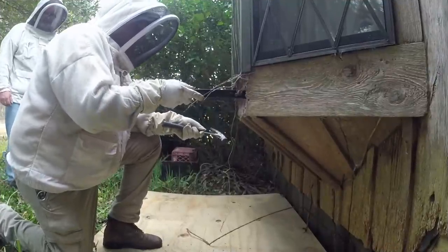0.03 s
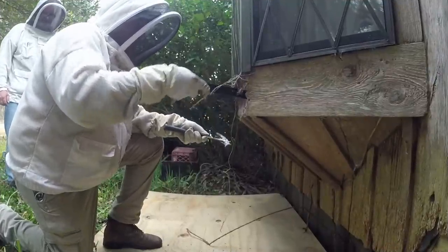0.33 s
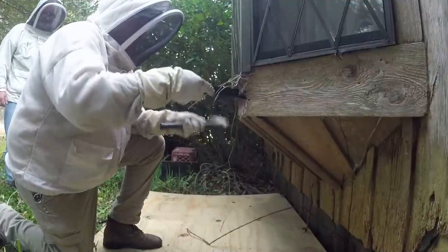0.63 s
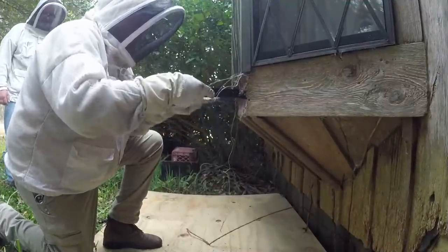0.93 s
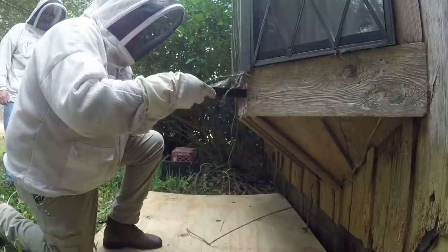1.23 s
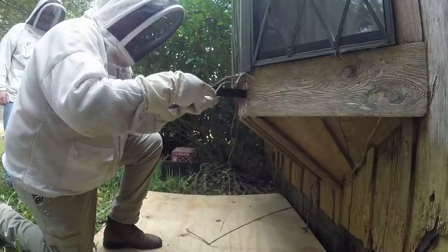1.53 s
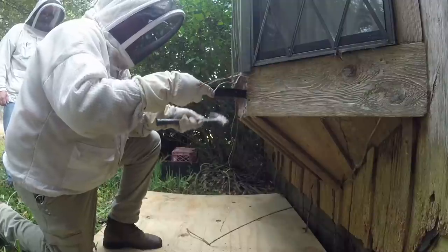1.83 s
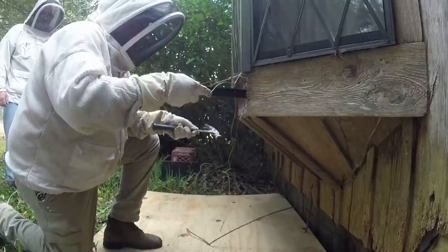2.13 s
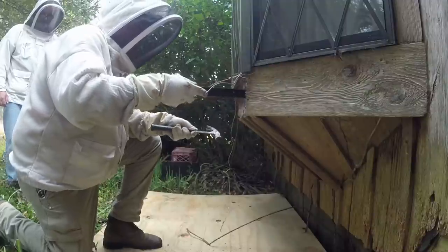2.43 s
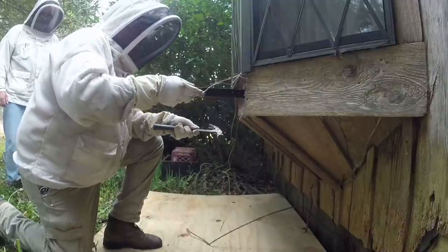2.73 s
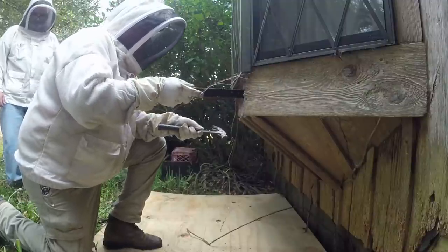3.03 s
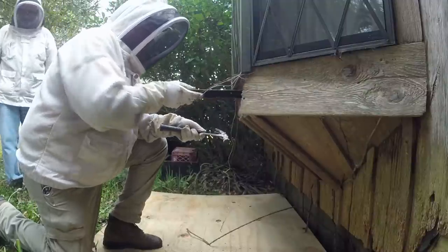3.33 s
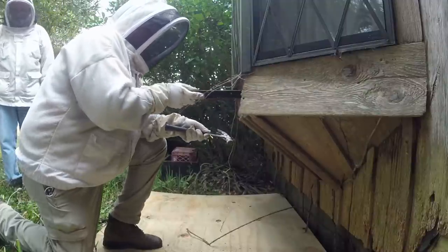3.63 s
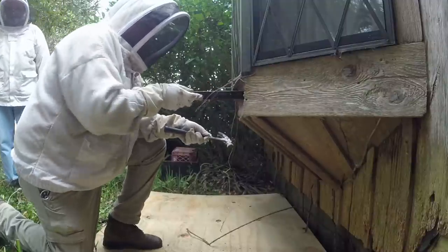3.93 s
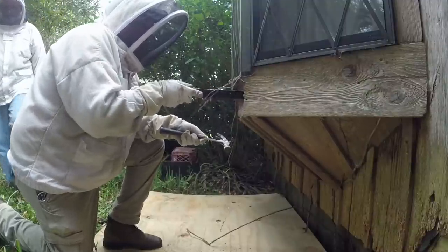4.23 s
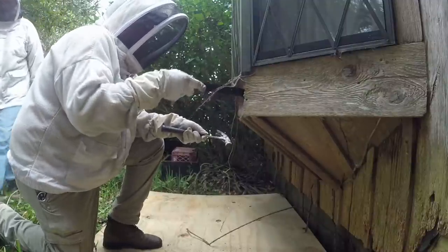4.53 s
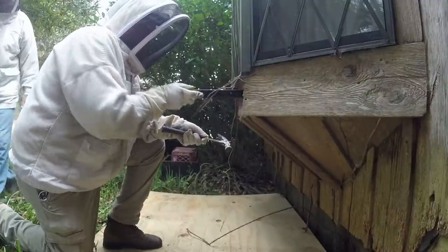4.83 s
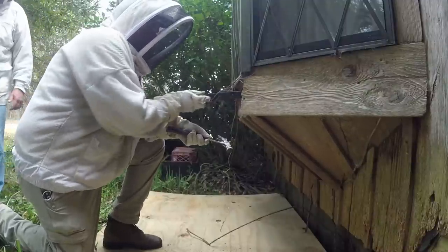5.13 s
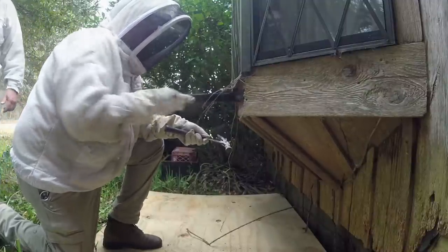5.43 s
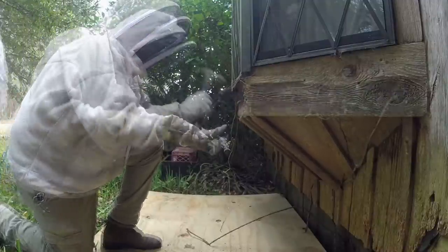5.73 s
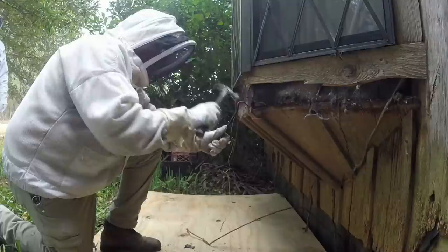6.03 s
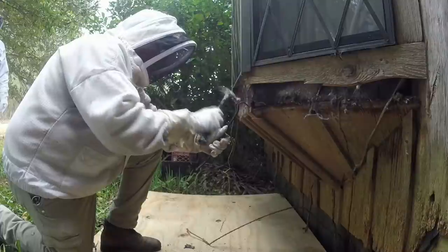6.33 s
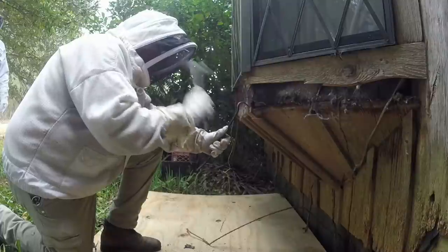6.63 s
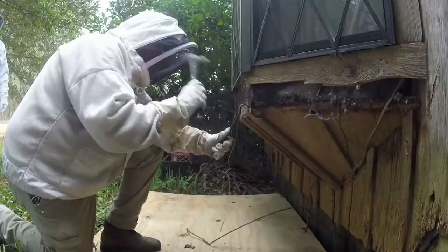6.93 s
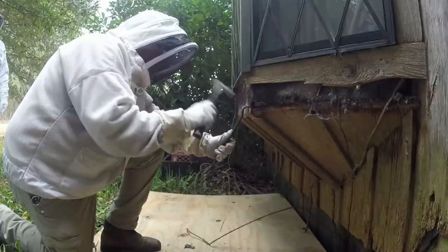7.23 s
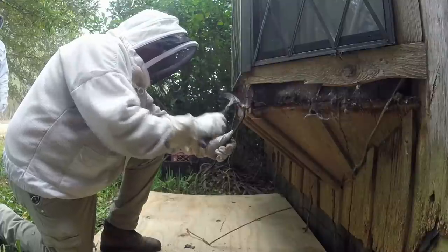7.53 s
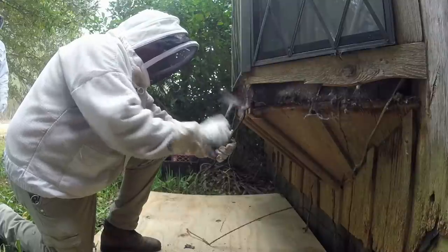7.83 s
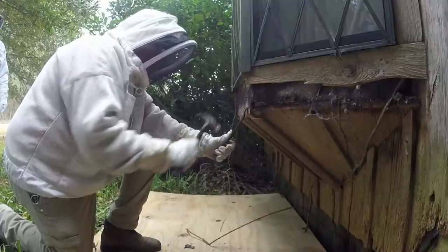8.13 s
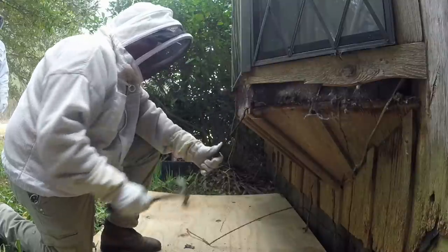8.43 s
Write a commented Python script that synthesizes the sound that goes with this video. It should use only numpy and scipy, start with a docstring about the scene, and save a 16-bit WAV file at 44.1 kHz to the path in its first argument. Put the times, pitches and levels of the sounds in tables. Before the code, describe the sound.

A steel pry bar scrapes in behind a wooden board on an outside wall, sticking and slipping for the first half second or so. Gloves rustle, and two hammer blows clang on the bar at about 1.1 and 1.6 seconds. From 2.5 to 3.8 seconds the board gives way in loud, dry cracks and knocks, with fibres splintering. Until nearly 6 seconds it is worked off the wall more quietly, with rubbing, creaks, small snaps and the rustle of heavy cloth; a nail gives a brief squeak at 5.3 seconds. At 5.6 seconds a hammer taps a nail, then hits it six times at an even pace from 6 to 7.9 seconds. Each blow thumps the wall and rings the steel, and the nail's pitch climbs. Everything sounds close, with a short yard echo, over faint air and a low breeze.

```python
"""A flat steel pry bar scrapes in behind a trim board on an outside wall, sticking and slipping.
Two hammer blows drive it home. Levered, the board gives way in dry cracks as nails slip and fibres snap.
It is pulled off, rubbing and creaking, gloves and heavy cloth rustling; the last nail squeaks free.
The hammer then taps a nail and hits it six times: the wall thumps, the steel rings, the yard echoes.
Faint air and a low breeze run throughout."""
import sys
import numpy as np
from scipy import signal
from scipy.fft import rfft, irfft, next_fast_len
from scipy.io import wavfile
from scipy.ndimage import uniform_filter1d, map_coordinates

SR = 44100
rng = np.random.default_rng(int(sys.argv[2]) if len(sys.argv) > 2 else 0)


def master_out(mix):
    """Clip the mix to full scale and print it as 16-bit PCM to the path in sys.argv[1]."""
    frames = np.transpose(np.atleast_2d(mix))
    ceiling = np.clip(frames, -1, 1)
    pcm = np.round(ceiling * 32767).astype(np.int16)
    wavfile.write(sys.argv[1], SR, pcm)


N = 374409
SIZE = 32768  # samples per event
T = np.arange(SIZE) / SR
HZ = np.fft.rfftfreq(SIZE, 1 / SR)

# Table levels are relative; the functions add their own gains.
# hammer on nail: t/s, strength/dB, hardness/dB, wall f/Hz, nail f/Hz, head ring/dB, claw ring/dB
NAIL_BLOWS = [(5.6486, -12, -1.5, 128, 1900, -52, -62), (6.0157, 0, -1.5, 120.3, 1997, -51.5, -66.5),
              (6.3996, 1, -3, 118.4, 2060, -50, -55.5), (6.755, 2, -2.5, 158, 2475, -43.5, -46),
              (7.146, 1.5, 0, 165.2, 2590, -45.5, -40.5), (7.5285, -0.5, 5.5, 163.4, 3626, -34, -51.5),
              (7.9072, 1, -3, 147, 3740, -43, -53)]
# hammer on bar, first blow a double contact: t/s, strength/dB, hardness/dB, freedom to ring/dB
BAR_BLOWS = [(1.116, -3, 5, 9), (1.125, 0.5, -3.5, 10), (1.554, 2, -3, -2.5)]
# board cracks (hard) and knocks (soft): t/s, strength/dB, hardness/dB
CRACKS = [(0.176, -7, -11.5), (2.4432, -21, -9), (2.48, -18, -3), (2.4904, 15, -2.5), (2.6793, 4.5, 0.5),
          (2.738, 9.5, 3), (2.8009, 2, 4.5), (2.8183, -5.5, 4), (2.8574, 0.5, 1), (2.8735, 4, 4),
          (2.9811, 15, 1.5), (3.032, 0.5, 4), (3.1674, -9.5, 6.5), (3.241, -13.5, 8.5), (3.2589, -19.5, 8),
          (3.276, -1.5, 4.5), (3.2965, 1.5, -1), (3.3037, 14, -2), (3.3438, 4, 5), (3.3805, 8.5, -7),
          (3.419, -9.5, -8), (3.7055, 14, -11), (3.7738, -3.5, -9), (3.9829, -15.5, 4), (4.2919, -4, -5.5),
          (4.348, -25.5, 14.5), (4.3869, -3, 0.5), (4.502, -16.5, 3), (4.872, -15.5, 1),
          (5.0126, -21, -2.5), (5.085, -18.5, -8), (5.111, -3, 5), (5.2902, -15, -7.5),
          (5.4372, -14.5, -3.5)]
# blade pushes: peak t/s, level/dB, rise/s, fall/s (each over 64 dB)
PUSHES = [(0.08, -27, 0.8, 0.65), (0.421, -37, 0.4, 0.28), (0.544, -43, 0.35, 0.37)]
# grip changes: t/s, glove level/dB, sleeve level/dB, sigma/s
GRIPS = [(0.904, -54.5, -64, 0.2), (2.268, -64, -61.5, 0.091), (2.432, -58, -64, 0.032)]
# board worked off the wall: t/s, rub level/dB, cloth level/dB
DRAG = [(3.8, -58, -69), (3.86, -53, -66), (3.99, -60, -71), (4.25, -59, -59.5), (4.33, -50, -49.5),
        (4.43, -48, -59), (4.48, -53, -53.5), (4.63, -58, -54), (4.86, -54.5, -68.5), (5.13, -52.5, -55),
        (5.25, -55, -71), (5.4, -57.5, -71), (5.55, -53.5, -54), (5.69, -57.5, -68.5), (5.83, -65.5, -60.5),
        (5.95, -75, -87)]
# board against wall: t/s, level/dB, sigma/s
SHOVES = [(0.024, -35.5, 0.0082), (0.052, -51.5, 0.015), (0.307, -42.5, 0.015), (0.411, -42.5, 0.011),
          (3.92, -48.5, 0.054), (5.24, -44.5, 0.016), (5.304, -34, 0.02)]
CREAKS = [(1.014, -51, .01), (3.94, -50, 0.034), (5.061, -47.5, 0.017), (5.111, -46, 0.033),
          (5.307, -49, 0.038), (5.472, -45, 0.014)]
# breeze envelope: t/s, level/dB
BREEZE = [(0.0, -51.5), (2.46, -60.5), (2.72, -62), (3.17, -71.5), (3.83, -54.5), (5.29, -56.5),
          (5.77, -63.5), (7.83, -64.5), (8.49, -64)]

# edges of the four impact bands: f/Hz
BAND_EDGES_HZ = [70, 300, 1200, 4500, 15000]
# impact response, a row per band: base level/dB over 10 ms, strength slope/(dB/dB), hardness slope/(dB/dB)
NAIL_BANDS = [(-28, 1.2, -0.6), (-26, 1, -0.3), (-16.5, 1, 0), (-16, 0.98, 0.3)]
BAR_BANDS = [(-39.5, 2, -0.1), (-21.5, -0.5, -1.05), (-17, 0.5, 0.06), (-18.5, 2, 1.4)]
BOARD_BANDS = [(-49.5, 0.51, -1.3), (-29, 1, -.5), (-30, 1, .5), (-39.5, 0.903, 1.09)]

# body resonances: f/Hz, width/Hz, level/dB
HEAD_MODES = [(166, 100, 0.5), (350, 60, -15), (527, 250, -15.5), (790, 160, -4.5), (2500, 42, -10.5),
              (3110, 220, 0), (3707, 82, 7.5), (4700, 280, -3), (5430, 100, -0.5), (6500, 96, 7.5),
              (7890, 80, 0.5), (8110, 110, 1), (9200, 38, -3.5), (10530, 130, -10), (11100, 170, -19),
              (12800, 120, -18.5), (14000, 90, -21.5)]
BAR_MODES = [(518, 28, 2), (870, 260, -1), (1450, 27, 2.5), (1652, 110, -1.5), (2050, 230, -6.5),
             (3120, 160, -4), (3710, 160, 1.5), (4630, 260, -0.5), (5530, 45, -2.5), (5940, 80, -7.5),
             (6450, 55, 1), (6900, 50, -7.5), (7930, 120, -13), (10900, 27, -17)]
BOARD_MODES = [(465, 91, -0.5), (576, 50, -5), (844.3, 65, 0), (998, 43, -2.5), (1490, 55, -11.5),
               (1940, 500, -13), (2460, 140, -6.5), (3160, 340, -8), (3870, 240, -13.5), (4620, 270, -14),
               (6320, 230, -11)]
SCRAPE_MODES = [(1010, 41, 3), (1828, 55, 0.5), (2100, 70, -4), (3134, 135, -4), (3850, 50, -0.5),
                (4220, 92, -5.5), (5690, 59, -5), (6460, 260, -6.5), (8400, 190, -16)]
CREAK_MODES = [(496, 200, -7.5), (850, 61, 0.5)]
# lingering steel partials: f/Hz, level/dB, t60/s
HEAD_RING = [(3720, -3, .25), (4700, -9.5, .3), (5390, -7.5, .27), (6440, -3, .4), (6540, -3, .38),
             (7870, -6, .32), (8300, -8, .38), (9120, -12.5, .35), (10730, -10.5, .22), (12030, -18.5, .2),
             (13000, -17, .22), (14000, -20, .26)]
BAR_RING = [(1480, 0, .18), (3610, -4, .25), (4590, -3, .58), (5365, -2, .3), (6470, -4, .34),
            (6560, -6, .42), (7105, -6, .2), (7730, -10, .42), (11250, -17, .33)]
# nail squeak partials: f/Hz, level/dB
SQUEAK_PARTIALS = [(2950, -6), (3250, -8), (4130, -4), (4400, 0), (4720, -2)]

# broad spectra: f/Hz, level/dB
HEAD_COLOUR = [(25, -25), (70, -3.5), (180, -9.5), (350, -10.5), (800, -7), (1250, -6), (2500, 7),
               (5000, -2), (8500, -7), (11000, -23), (15000, -23)]
BAR_COLOUR = [(25, -26), (80, -13.5), (350, -15), (700, -11.5), (1200, -14), (3000, -3), (6500, -19.5),
              (9000, -29), (15000, -46)]
BOARD_COLOUR = [(25, -29), (90, -9), (200, -9), (330, -17.5), (600, -13), (1250, -30), (1900, -22),
                (3000, -10), (6800, -22.5), (8000, -21.5), (10000, -21.5), (15000, -36.5)]
SCRAPE_COLOUR = [(150, -11.5), (400, -12), (700, -24), (1300, -19), (2000, -11.5), (4000, -8.5),
                 (6500, -18.5), (10800, -16.5), (15500, -39)]
RUB_COLOUR = [(60, -13), (140, 3), (300, -1.5), (550, 0.5), (700, -3.5), (880, -1.5), (1250, -10),
              (3000, -13.5), (6000, -33)]
CLOTH_COLOUR = [(880, -38.5), (1500, -10.5), (3180, -0.5), (4890, -5.5), (6620, -4), (7600, -11.5),
                (11000, -14.5), (15500, -29.5)]
SHOVE_COLOUR = [(25, -3), (70, 1), (120, 4.5), (250, -4.5), (450, -5.5), (800, -21.5), (2000, -34),
                (5000, -80)]
AIR_COLOUR = [(20, -2.5), (100, -15.5), (153, -9), (225, -20.5), (400, -17), (600, -19.5), (1700, -26),
              (3200, -24), (4800, -31.5), (6500, -30.5), (9000, -40), (12000, -50), (15500, -61.5)]
# yard decay: f/Hz, t60/s
YARD_DECAY = [(100, 0.46), (500, 0.3), (1500, 0.23), (3000, 0.21), (7000, .23), (15000, 0.22)]


def hammer(thump_db=-26, thump_step_db=1, head_db=-1, claw_db=-4, claw_hz=10366, claw_t60_s=0.71,
           nail_db=10, nail_width_hz=100, nail_ring_db=-18, nail_t60_s=0.08):
    """Steel on a nail whose pitch climbs as it shortens; the wall thumps, head and claw ring on."""
    out = np.zeros(N)
    for k, (s, strength_db, hardness_db, wall_hz, nail_hz, head, claw) in enumerate(NAIL_BLOWS):
        levels_db = band_levels(NAIL_BANDS, strength_db, hardness_db)
        modes = varied(HEAD_MODES, detune=0.0027, spread_db=0.5) + [(nail_hz, nail_width_hz, nail_db)]
        body = resonant(modes, HEAD_COLOUR, HZ, modes_db=4.5)
        force = contact(tau_s=0.0012) * rebound()
        add(out, s, blow(body, levels_db, force, wet_db=-11.5, blur=0.33))
        add(out, s, amp(thump_db + strength_db + k * thump_step_db) * thump(wall_hz))
        add(out, s, ringing([(nail_hz, nail_ring_db, nail_t60_s)], levels_db[2]))
        add(out, s, ringing(HEAD_RING, head + head_db))
        add(out, s, amp(claw + claw_db) * np.sin(2 * np.pi * claw_hz * T) * fade(T, claw_t60_s))
    return out


def rebound(mid_delay_s=0.0018, spread=0.25, level_db=-7.5):
    """Spectrum of a contact and the hammer's quick second touch."""
    delay_s = mid_delay_s * np.exp(spread * rng.standard_normal())
    return (1 + amp(level_db) * np.exp(-2j * np.pi * HZ * delay_s)) / np.hypot(1, amp(level_db))


def thump(hz, t60_s=0.16, rise_s=0.0063):
    """The wall swings briefly at its lowest mode."""
    return np.sin(2 * np.pi * hz * T) * fade(T, t60_s) * (1 - np.exp(-T / rise_s))


def ringing(modes, level_db, spread_db=1, blur_hz=14):
    """Steel partials, random in strength and phase; the swinging tool blurs their pitch."""
    draws = rng.standard_normal((len(modes), 2))
    drifts = np.cumsum(rng.standard_normal((len(modes), SIZE)), axis=1) * np.sqrt(2 * np.pi * blur_hz / SR)
    out = np.zeros(SIZE)
    for (hz, db, t60_s), (size, phase), drift in zip(modes, draws, drifts):
        tone = np.sin(2 * np.pi * (hz * T + phase) + drift)
        out += amp(level_db + db + spread_db * size) * tone * fade(T, t60_s)
    return out


def pry_bar(gain_db=1.57, ring_db=-33, thump_db=-31, wall_hz=160):
    """The hammer drives the bar in; seated deeper, it rings less and the wall thumps more."""
    out = np.zeros(N)
    for s, strength_db, hardness_db, free_db in BAR_BLOWS:
        levels_db = band_levels(BAR_BANDS, strength_db, hardness_db)
        body = resonant(BAR_MODES, BAR_COLOUR, HZ, free_db)
        add(out, s, blow(body, levels_db + gain_db, contact(tau_s=0.00086), wet_db=-15, blur=0.24))
        add(out, s, ringing(BAR_RING, levels_db[-1] + ring_db + free_db))
        add(out, s, amp(thump_db + strength_db - free_db) * thump(wall_hz))
    return out


def board_cracks(flex_hz=105, flex_db=-47, flex_slope=0.7, flex_t60_s=0.29, held_until_s=3.1):
    """Nails slip and fibres snap; while the board is held tight, each crack also sets it flexing."""
    out = np.zeros(N)
    flex = np.sin(2 * np.pi * flex_hz * T) * fade(T, flex_t60_s)
    for s, strength_db, hardness_db in CRACKS:
        levels_db = band_levels(BOARD_BANDS, strength_db, hardness_db)
        body = resonant(varied(BOARD_MODES, detune=0.028, spread_db=2), BOARD_COLOUR, HZ, modes_db=3)
        force = contact(tau_s=0.0014) * splinters()
        add(out, s - 0.001, blow(body, levels_db, force, wet_db=-16, blur=0.72))
        if s < held_until_s:
            add(out, s, amp(flex_db + flex_slope * strength_db) * flex)
    return out


def splinters(level_db=-9, snaps_per_s=900, t60_s=0.084):
    """Spectrum of one snap and a fading shower of small ones."""
    snaps = rng.standard_normal(SIZE) * (rng.random(SIZE) < snaps_per_s / SR)
    shower = unit(snaps * fade(T, t60_s) * (T > 0.002))
    return 1 + amp(level_db) * rfft(shower) / np.sqrt(SIZE)


def tearing(level_db=-50, slope=0.6, rise_s=0.03, t60_s=0.2, grain_db=5):
    """Fine fibres crackle around each crack, louder for a stronger one."""
    strain = np.zeros(N)
    shape = fade(np.maximum(1 - T / rise_s, (T - rise_s) / t60_s), 1)
    for s, strength_db, _ in CRACKS:
        add(strain, s - rise_s, amp(slope * strength_db) * shape)
    fibres = rng.standard_normal(N) * amp(grain_db * wobble(700))
    crackle = unit(filtered(fibres, lambda hz: resonant(BOARD_MODES, BOARD_COLOUR, hz, modes_db=-3)))
    return amp(level_db) * strain * crackle


def scrape(hiss_db=-4, ring_db=-1.5, damping_db_per_s=14, grain_db=4, chatter_db=2,
           jerks=13, jerks_per_s=29, jitter_s=0.004, slip_db=-15.5, spread_db=3.5, slip_s=0.005):
    """The blade hisses on wood, sticks and slips, ringing the bar; the wood damps it as it goes deeper."""
    def steel(hz):
        return resonant(SCRAPE_MODES, [(100, -39), (3000, -28), (7000, -17), (15000, -25.5)], hz, 2)

    push = sum(amp(db) * burst(s, rise_s, fall_s) for s, db, rise_s, fall_s in PUSHES)
    grit = rng.standard_normal(N) * amp(grain_db * wobble(900) + chatter_db * wobble(70))
    hiss = amp(hiss_db) * coloured(grit, SCRAPE_COLOUR)
    ring_gain = amp(ring_db - damping_db_per_s * np.arange(N) / SR)
    ring = ring_gain * unit(filtered(rng.standard_normal(N), steel))
    out = push * (hiss + ring)
    response = minimum_phase(steel(HZ))
    for k, (late, size) in enumerate(rng.standard_normal((jerks, 2))):
        s = (k + 1) / jerks_per_s + jitter_s * late
        jerk = unit(irfft(response * contact(slip_s, passes=1) * (0.5 + yard(wet_db=-15))))
        add(out, s - slip_s, push[round(s * SR)] * amp(slip_db + spread_db * size) * jerk)
    return out


def squeak(at_s=5.292, level_db=-43, rise_s=0.004):
    """The last nail slides free with a short, unsteady chirp."""
    out = np.zeros(N)
    shape = T / rise_s * np.exp(1 - T / rise_s)
    for hz, db in SQUEAK_PARTIALS:
        cycles = np.cumsum(hz * (1 + 0.017 * wobble(600)[:SIZE])) / SR
        add(out, at_s - rise_s, amp(level_db + db) * shape * np.sin(2 * np.pi * cycles))
    return out


def creaks(gain_db=0.5, slips_per_s=260, low_cut_hz=200):
    """Uneven runs of tiny slips ring the board's lowest resonances."""
    slips = (rng.random(N) < slips_per_s / SR) * rng.uniform(0.29, 1, N)
    colour = [(100, -56), (2500, -14.5), (9000, -43)]
    wood = unit(filtered(slips, lambda hz: resonant(CREAK_MODES, colour, hz, 4) * (hz > low_cut_hz)))
    return wood * sum(amp(db + gain_db) * swell(s, sigma_s) for s, db, sigma_s in CREAKS)


def handling(rub_db=1, cloth_db=2, fade_s=0.08):
    """The board rubs and bumps on the wall; gloves and sleeves rustle."""
    start_s, end_s = DRAG[0][0], DRAG[-1][0]
    dragging = np.interp(np.arange(N) / SR, [start_s - fade_s, start_s, end_s, end_s + fade_s], [0, 1, 1, 0])
    drag_rub_db, drag_cloth_db = curves(DRAG)
    rub = dragging * amp(drag_rub_db + rub_db)
    cloth = dragging * amp(drag_cloth_db + cloth_db)
    for s, glove_db, sleeve_db, sigma_s in GRIPS:
        move = swell(s, sigma_s)
        rub += amp(glove_db) * move
        cloth += amp(sleeve_db) * move
    fibres = rng.standard_normal(N) * amp(3 * wobble(300) + 1.5 * wobble(25))
    wood = rub * coloured(fibres, RUB_COLOUR)
    sleeves = cloth * unit(noise(CLOTH_COLOUR) * amp(1.2 * wobble(380) + 1.5 * wobble(60)))
    shoves = sum(amp(db) * swell(s, sigma_s) for s, db, sigma_s in SHOVES)
    return wood + sleeves + shoves * noise(SHOVE_COLOUR)


def yard(wet_db, near_db=-9, near_t60_s=0.054, trees_db=-27, trees_t60_s=0.13, slap_db=-40, slap_s=0.183):
    """Echo spectrum: near boards, the yard's tail, trees, one faint far wall."""
    hz, t, cells = signal.stft(rng.standard_normal(SIZE), SR, nperseg=256)
    tail = signal.istft(cells * fade(t, along(YARD_DECAY, hz)[:, None]), SR, nperseg=256)[1][:SIZE]
    near = rng.standard_normal(SIZE) * fade(T, near_t60_s) * (T > 0.002)
    trees = rng.standard_normal(SIZE) * fade(T, trees_t60_s) * (T > 0.03)
    slap = rng.standard_normal(SIZE) * fade(np.abs(T - slap_s), 0.25) * (T > slap_s)
    far = rfft(amp(trees_db) * unit(trees) + amp(slap_db) * unit(slap))
    close = rfft(amp(near_db) * unit(near) + amp(wet_db) * unit(tail * (T > 0.007)))
    return (close + far / (1 + (HZ / 6000) ** 2)) / np.sqrt(SIZE)


def foliage_echo(x, level_db=-35, t60_s=0.51, rise_s=0.065, centre_hz=3200, width_hz=2200):
    """Distant foliage scatters a faint, long, mid-treble tail."""
    tail = unit(rng.standard_normal(SIZE) * fade(T, t60_s) * (1 - np.exp(-T / rise_s))) / np.sqrt(SIZE)
    echo = signal.fftconvolve(x, tail)[:N]
    return amp(level_db) * filtered(echo, lambda hz: 1 / (1 + (2 * (hz - centre_hz) / width_hz) ** 2))


def outdoors(air_db=-63):
    """Faint garden air with a low, uneven breeze."""
    breeze_db, = curves(BREEZE)
    breeze = noise([(15, -2.5), (30, -3), (70, 0), (140, -16.5), (400, -27), (2000, -69.5)])
    air = amp(air_db + wobble(1.2)) * noise(AIR_COLOUR)
    return air + amp(breeze_db + 1.4 * wobble(0.87)) * breeze


def blow(body, levels_db, force, wet_db, blur):
    """A force rings a body, its bands scaled toward levels_db; direct sound plus yard echoes."""
    edges = np.array(BAND_EDGES_HZ)
    centres = np.sqrt(edges[:-1] * edges[1:])
    for _ in range(2):
        energy = np.array([np.sum(body[(HZ >= lo) & (HZ < hi)] ** 2) for lo, hi in zip(edges, edges[1:])])
        now_db = 10 * np.log10(2 * energy / SIZE / (SR / 100))
        body = body * amp(along(np.column_stack([centres, levels_db - now_db]), HZ))
    # other directions carry other peaks, so echoes are smoother in the treble
    smooth = np.sqrt(np.abs(uniform_filter1d(body ** 2, size=601)))
    share = np.clip(blur, 0, 1) * np.clip(HZ / 1500, 0, 1)
    echoes = minimum_phase(body ** (1 - share) * smooth ** share) * yard(wet_db)
    return irfft(force * (minimum_phase(body) + echoes))


def contact(tau_s, passes=3):
    """Near-flat spectrum of a brief rough contact that swells and dies."""
    shape = (T / tau_s) ** 2 * np.exp(-T / tau_s)
    spectrum = rfft(rng.standard_normal(SIZE) * shape)
    for _ in range(passes):
        whitened = irfft(spectrum / (np.abs(spectrum) + 1e-12))
        spectrum = rfft(whitened * np.sqrt(shape / shape.max()))
    return spectrum / np.sqrt(np.mean(np.abs(spectrum) ** 2))


def band_levels(bands, strength_db, hardness_db):
    """dB per band: strength adds level overall, hardness trades bass for treble."""
    return np.array(bands) @ [1, strength_db, hardness_db]


def varied(modes, detune, spread_db):
    """Each blow lands on another spot: modes shift slightly in pitch and level."""
    draws = rng.standard_normal((len(modes), 2))
    return [(hz * np.exp(detune * shift), width_hz, db + spread_db * size)
            for (hz, width_hz, db), (shift, size) in zip(modes, draws)]


def resonant(modes, colour, hz, modes_db):
    """Body gain: resonance peaks on a broad colour."""
    peaks = sum(amp(db + modes_db) ** 2 / (1 + (2 * (hz - f) / width) ** 2) for f, width, db in modes)
    return np.sqrt(peaks + amp(along(colour, hz)) ** 2)


def minimum_phase(gain):
    """Causal response with this gain."""
    cepstrum = irfft(np.log(np.maximum(gain, 1e-6)))
    cepstrum[1:SIZE // 2] *= 2
    cepstrum[SIZE // 2 + 1:] = 0
    return np.exp(rfft(cepstrum))


def filtered(x, response):
    """x through a gain given as a function of Hz."""
    size = next_fast_len(N + SR // 2)
    return irfft(rfft(x, size) * response(np.fft.rfftfreq(size, 1 / SR)), size)[:N]


def coloured(x, colour):
    """x shaped by a colour, rms 1."""
    return unit(filtered(x, lambda hz: amp(along(colour, hz))))


def noise(colour):
    """Coloured noise, rms 1."""
    return coloured(rng.standard_normal(N), colour)


def wobble(knots_per_s):
    """Smooth random curve."""
    knots = rng.standard_normal(int(N * knots_per_s / SR) + 4)
    return map_coordinates(knots, [np.arange(N) * knots_per_s / SR])


def burst(at_s, rise_s, fall_s):
    """Exponential rise to 1 at at_s, then decay."""
    t = np.arange(N) / SR - at_s
    return fade(np.maximum(-t / rise_s, t / fall_s).clip(0, 10), 0.94)


def swell(at_s, sigma_s):
    """Gaussian bump, height 1."""
    return np.exp(-0.5 * np.minimum(((np.arange(N) / SR - at_s) / sigma_s) ** 2, 100))


def fade(t, t60_s):
    """Exponential decay."""
    return np.exp(-np.log(1000) * t / t60_s)


def curves(rows):
    """Per-sample curve for each column after t/s."""
    times_s, *columns = np.transpose(rows)
    return [np.interp(np.arange(N) / SR, times_s, column) for column in columns]


def along(points, hz):
    """Interpolate (f/Hz, value) points on a log axis."""
    f, values = np.transpose(points)
    return np.interp(np.log(hz + 1), np.log(f + 1), values)


def add(track, at_s, sound):
    """Mix a sound into a track."""
    start = max(round(at_s * SR), 0)
    track[start:start + len(sound)] += sound[:N - start]


def amp(db):
    """dB to gain."""
    return 10 ** (np.asarray(db) / 20)


def unit(x):
    """Scale to rms 1."""
    return x / np.sqrt(np.mean(x ** 2) + 1e-20)


def scene():
    """Mono mix of all sources."""
    blows = pry_bar() + hammer()
    echo = foliage_echo(blows)
    prying = board_cracks() + tearing() + scrape() + squeak() + creaks()
    return (blows + echo + prying + handling() + outdoors())[None]


def record(dry, ceiling=0.92, top_hz=15450):
    """Soft peak limit, then a steep low-pass."""
    rounded = dry[0] / (1 + np.abs(dry[0] / ceiling) ** 6) ** (1 / 6)
    return filtered(rounded, lambda hz: 1 / np.sqrt(1 + (hz / top_hz) ** 300))[None]


dry = scene()
out = record(dry)
master_out(out)
```